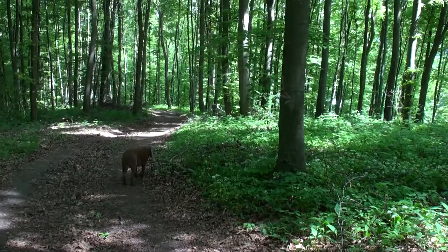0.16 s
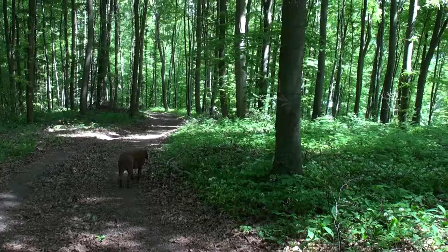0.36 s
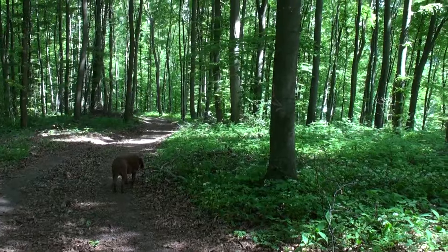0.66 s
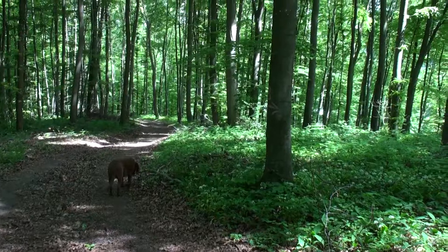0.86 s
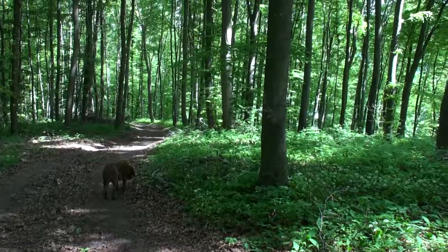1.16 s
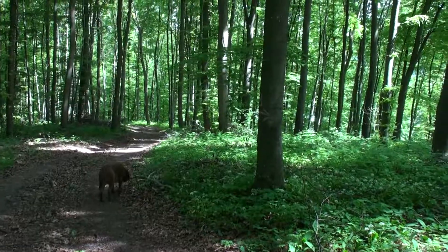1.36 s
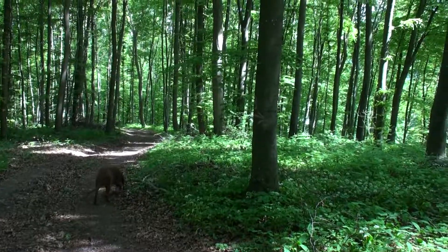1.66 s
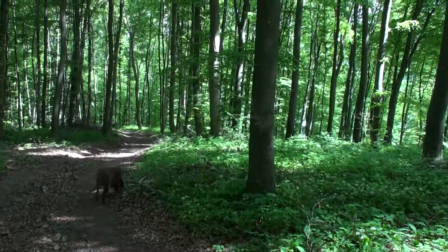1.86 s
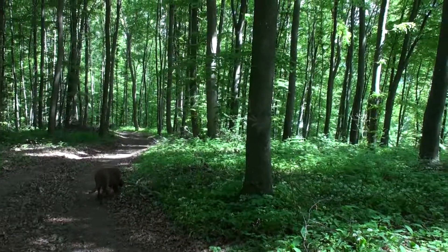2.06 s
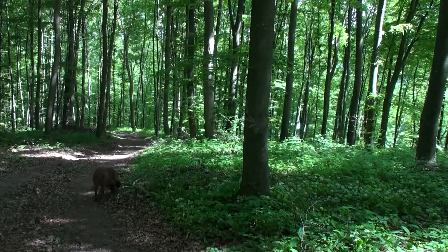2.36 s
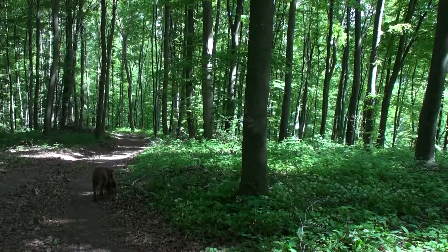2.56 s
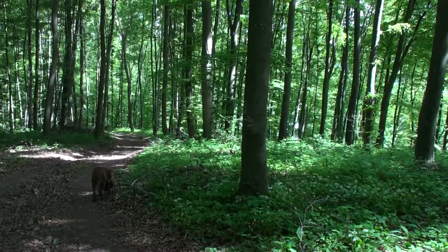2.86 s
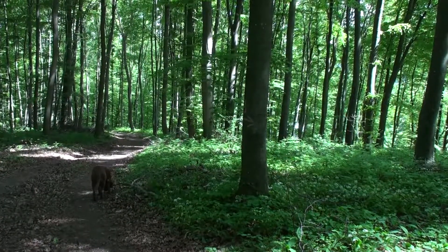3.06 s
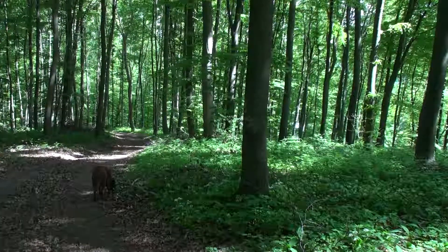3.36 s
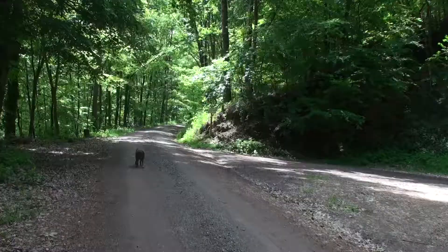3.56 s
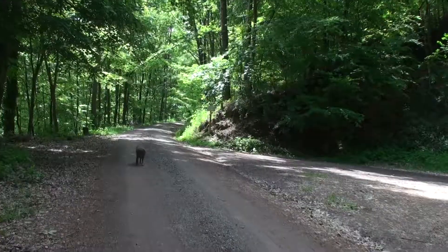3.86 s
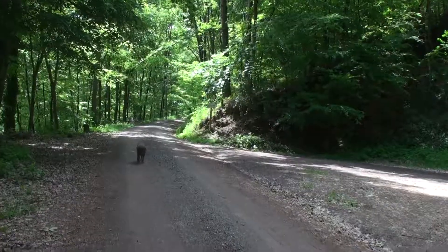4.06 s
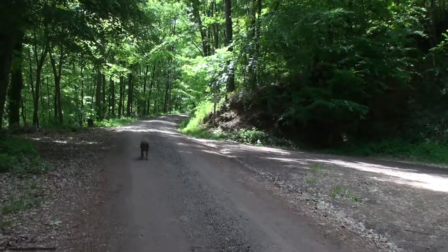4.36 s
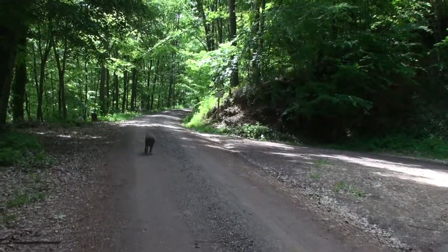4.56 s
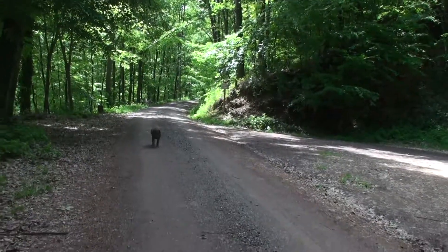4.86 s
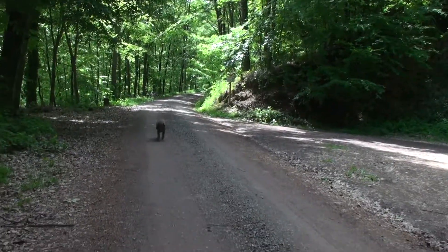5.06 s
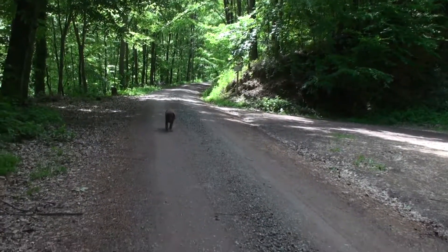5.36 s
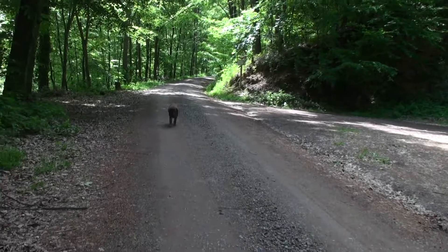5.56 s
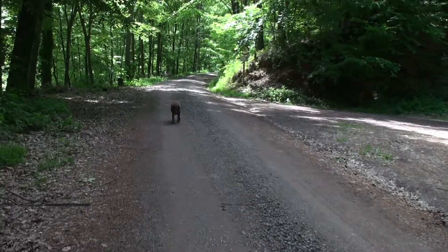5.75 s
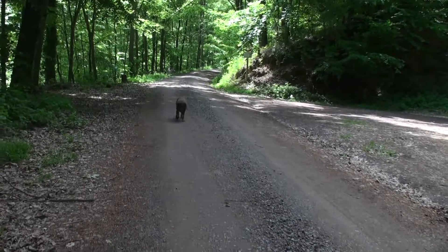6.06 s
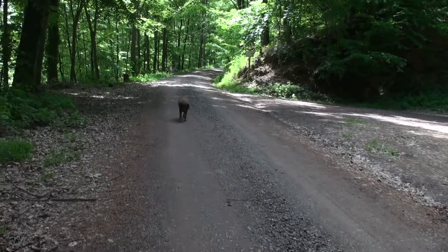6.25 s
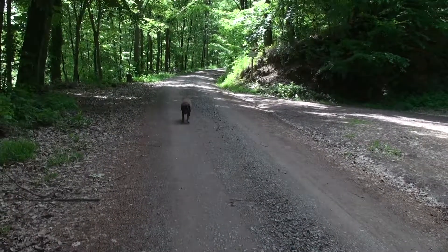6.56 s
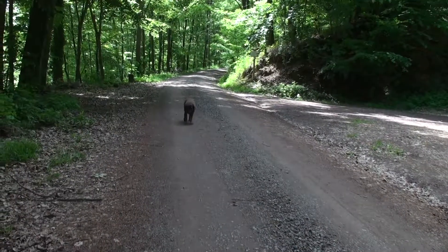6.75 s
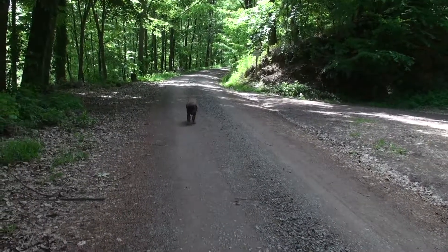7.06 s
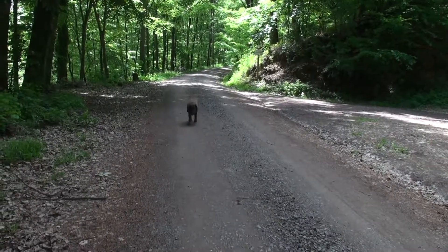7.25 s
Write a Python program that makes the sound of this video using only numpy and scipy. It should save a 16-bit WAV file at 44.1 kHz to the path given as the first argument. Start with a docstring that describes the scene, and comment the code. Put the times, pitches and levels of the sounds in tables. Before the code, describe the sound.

A quiet beech wood, with soft wide canopy air and a faint low hum. From 0 to 3.5 s thin high whistles and hoarse calls sound far away with long echoes; two plunging calls come at about 0.9 and 1.3 s. A dull scuff at 0.1 s is followed from 1.7 s by leaf rustles and small dry twig snaps close by, with soft low chirps from 3 s. A very sharp snap at 3.47 s meets an abrupt cut to a forest road with brighter air. A loud double chirp rings at 3.6 and 3.8 s, then distant calls and a few light clicks underfoot. From 5.6 s a near chaffinch, slightly left, swells through five notes, trills rapidly at 6.2 s, and from 6.45 s repeats loud falling sweeps to the end, about seven a second, topped by high buzzes, while a blackbird flutes mellow slurs.

```python
"""Thin, distant bird calls over a low hum, with scuffs and snapping twigs, open a walk in a beech wood.
A second spot follows abruptly, a forest road: a loud double chirp, then a blackbird's fluting and a near
chaffinch whose song swells into falling sweeps. Birds are gliding tones with overtones and pitch shake;
footfall and canopy air are filtered noise, twigs add damped swings. Trunks scatter notes into a tail."""
import sys
import numpy as np
from scipy import signal
from scipy.fft import rfft, irfft
from scipy.io import wavfile
from scipy.ndimage import uniform_filter1d

SR = 44100
rng = np.random.default_rng(int(sys.argv[2]) if len(sys.argv) > 2 else 0)


def file_out(sig):
    """Save sig as 16-bit WAV at sys.argv[1]."""
    # one column per channel
    cols = np.atleast_2d(sig).T
    # limit, then scale
    lim = np.clip(cols, -1, 1)
    pcm = np.round(lim * 32767).astype(np.int16)
    wavfile.write(sys.argv[1], SR, pcm)


N = 326781
TIME = np.arange(N) / SR
CUT_S, RESUME_S = 3.493, 3.501  # the path ends, the road begins
SWEEP_FIRST_S, SWEEP_PERIOD_S = 6.453, .1548  # beats of the chaffinch's falling sweeps
# shape of a call: (start and end pitch as factors of the middle pitch, rasp as share of the pitch)
WHISTLE_SHAPE, BUZZ_SHAPE = (1.018, 0.98, .011), (.91, 1.08, .075)


def undb(db):
    """Decibels to amplitude: 20 dB is a factor of ten."""
    return 10 ** (np.asarray(db) / 20)


def unit(x):
    """Power normalisation: scale to rms 1."""
    return x / np.sqrt(np.mean(x ** 2))


def add(track, s, sound):
    """Superposition: mix a sound into a track at time s."""
    i = int(s * SR)
    track[i:i + len(sound)] += sound[:max(N - i, 0)]


def walk(rate, size=N):
    """Low-passed random process: smooth chance of spread near 1 that changes rate times a second."""
    k = max(int(SR / rate), 2)
    steps = np.repeat(rng.standard_normal(size // k + 1), k)
    return 1.27 * uniform_filter1d(uniform_filter1d(steps, k), k)[:size]


def colour(x, points):
    """Spectral shaping: filter by (frequency [Hz], level [dB]) points joined on a log-frequency axis."""
    hz, db = np.transpose(points)
    log_hz = np.log(np.fft.rfftfreq(len(x), 1 / SR) + 1)
    return irfft(rfft(x) * undb(np.interp(log_hz, np.log(hz), db)), len(x))


def resonate(x, hz, width_hz):
    """Damped resonance: one peak whose quality factor is centre over bandwidth."""
    return signal.lfilter(*signal.iirpeak(min(hz, SR / 3), hz / min(width_hz, SR / 3), fs=SR), x)


def forest(x, scatter_db, tail_db, scatter_t60, tail_t60, pan_db):
    """Multiple scattering: direct sound, echoes off near trunks and a diffuse tail; total power is kept."""
    t = TIME[:2 * SR]
    noise = rng.standard_normal((6, len(t)))
    struck = rng.random((3, len(t))) < 1500 / SR  # about 1500 echoes a second
    trunks = noise[:3] * struck * undb(-60 * t / scatter_t60) * (t > .004)
    depths = noise[3:] * undb(-60 * t / tail_t60) * (1 - np.exp(-t / 0.038))
    echoes = undb(scatter_db) * unit(trunks) + undb(tail_db) * unit(depths)
    mid, left, right = echoes / np.sqrt(len(t))
    # most echoes come from the front and reach both ears alike
    response = mid + 0.4 * np.array([left, right])
    response[:, 0] += 1  # the direct sound
    response /= np.sqrt(np.sum(response ** 2) / 2)
    return signal.fftconvolve(x[None], response, axes=1)[:, :N] * undb([[pan_db / 2], [-pan_db / 2]])


def sing(notes, overtone_db, flutter_db):
    """Frequency modulation: tones glide through three pitches; a fast shake of the pitch makes them rasp."""
    out, shake, flutter = np.zeros(N), walk(1100, 2 * N), walk(90, 2 * N)
    for s, length, start, middle, end, db, rasp in notes:
        u = np.linspace(0, 1, int(length * SR))
        span = int(s * SR) + np.arange(len(u))
        glide = np.polyval(np.polyfit([0, .5, 1], [start, middle, end], 2), u)
        hz = glide * (1 + rasp * shake[span])
        phase = 2 * np.pi * np.cumsum(hz) / SR
        tone = 0
        for k in range(3):
            audible = (k + 1) * hz < SR / 2
            tone = tone + undb(overtone_db * np.sqrt(k)) * np.sin((k + 1) * phase) * audible
        # the note opens a little faster than it closes
        swell = np.sin(np.pi * u ** .8).clip(0) ** .65
        add(out, s, np.sqrt(2) * undb(db + flutter_db * flutter[span]) * swell * tone)
    return out


def calls(rows, shape):
    """Scaling of pitch contours: every call of one kind has the same bend and rasp."""
    start, end, rasp = shape
    return [(s, length, start * hz, hz, end * hz, db, rasp) for s, length, hz, db in rows]


def phrase(syllable, beats):
    """Repetition: place a syllable on each beat at that beat's level and pitch factor."""
    return [(s + lag, length, a * pitch, b * pitch, c * pitch, db + part_db, rasp)
            for s, db, pitch in beats for lag, length, a, b, c, part_db, rasp in syllable]


def beats(count, first_s, period_s, db, gain_db, pitch, sag):
    """Linear progression: even beats whose level steps by gain_db and pitch factor falls by sag."""
    return [(first_s + k * period_s, db + k * gain_db, pitch - k * sag) for k in range(count)]


def air(spectrum, db, sway_db, low_mid_db):
    """Broadband noise of the canopy: alike in both ears in the bass and wide in the treble."""
    # width of the air: (frequency [Hz], side minus mid [dB])
    side_spectrum = [(30, -27), (70, -25), (130, -13), (270, -6), (500, -4), (1000, -3), (3000, -1.5),
                     (12000, -2.5)]
    mid, side = (colour(rng.standard_normal(N), spectrum) for _ in range(2))
    pair = mid + np.array([[1], [-1]]) * colour(side, side_spectrum)
    pair = np.array([colour(ear, [(70, 0), (115, low_mid_db), (180, 0)]) for ear in pair])
    return unit(pair) * undb(db + sway_db * walk(3.14))


def drone(hz, db, waver_hz, sway_db):
    """Slow random modulation: a faint lasting tone wavers in pitch and strength."""
    phase = 2 * np.pi * np.cumsum(hz + waver_hz * walk(12)) / SR
    return unit(np.sin(phase) * undb(sway_db * walk(11))) * undb(db)


def distant_calls():
    """Pitch contours of small birds at both spots: whistles sag, hoarse calls and lisps rise."""
    # thin distant whistles: (time [s], length [s], pitch [Hz], level [dB])
    whistles = [(.035, 0.057, 6080, -46), (.42, 0.12, 5460, -39.5), (.69, 0.16, 4090, -42.5),
                (1.33, .24, 2740, -51.5), (1.89, 0.24, 7460, -46), (2.2, 0.098, 7380, -46),
                (2.4, .14, 4790, -41.5), (2.52, .18, 3770, -46.5), (2.68, .15, 5740, -52),
                (2.745, 0.13, 4100, -41.5), (2.88, .16, 5000, -46), (3.22, 0.094, 7700, -51.5),
                (3.29, 0.16, 6800, -54.5), (3.6, .1, 2104, -44.5), (5.08, 0.077, 4155, -38),
                (5.35, 0.085, 5250, -41.5)]
    # hoarse distant calls: (time [s], length [s], pitch [Hz], level [dB])
    buzzes = [(.085, 0.058, 2520, -37), (.13, .15, 4160, -42.5), (1.42, .18, 4145, -42.5),
              (2.62, 0.21, 4185, -41.5), (3.5, .16, 2577, -38.5), (3.61, 0.071, 3830, -34.5),
              (3.78, .16, 4950, -47), (3.95, .13, 2645, -40.5), (4.87, .16, 4810, -46.5),
              (5.47, .1, 4500, -40)]
    # very high lisping calls: (time [s], length [s], pitch [Hz], level [dB])
    lisps = [(.08, .04, 6560, -43), (4.17, .14, 7550, -50.5), (4.34, .07, 8170, -45),
             (4.61, .12, 7250, -49.5), (5.22, .08, 7450, -49)]
    lisp_shape = (0.98, 1.02, .033)
    return calls(whistles, WHISTLE_SHAPE) + calls(buzzes, BUZZ_SHAPE) + calls(lisps, lisp_shape)


def path_birds():
    """Direct-to-scattered ratio: crown whistles carry long echoes, undergrowth chirps short weak ones."""
    # a call that plunges between two thin notes:
    # (time from the beat [s], length [s], start [Hz], middle [Hz], end [Hz], level [dB], rasp [share of pitch])
    plunge = [(-.03, 0.051, 7250, 7150, 7000, -6, .016), (0, .11, 6800, 3890, 2550, 0, .055),
              (.025, .07, 5300, 5190, 5080, -4.5, .026)]
    # it comes twice: (time [s], level [dB], pitch [factor])
    plunge_beats = [(.943, -44, 0.99), (1.262, -46.5, 1)]
    # a slur in the crowns and one in the undergrowth:
    # (time [s], length [s], start [Hz], middle [Hz], end [Hz], level [dB], rasp [share of pitch])
    falling_slur = (2.305, .085, 5560, 5180, 4950, -40.5, .015)
    rising_slur = (1.742, .14, 2750, 3410, 4270, -45.5, .006)
    # soft chirps: (time [s], pitch [Hz], level [dB])
    chirp_rows = [(2.975, 2600, -41), (3.129, 2482, -41), (3.248, 2730, -36.5), (3.338, 3020, -35),
                  (3.424, 2980, -37)]
    chirp_s, chirp_shape = 0.0215, (.86, 0.83, 0.068)
    notes = [note for note in distant_calls() if note[0] < CUT_S]
    notes += phrase(plunge, plunge_beats) + [falling_slur]
    chirps = calls([(s, chirp_s, hz, db) for s, hz, db in chirp_rows], chirp_shape)
    high = sing(notes, overtone_db=-45, flutter_db=3.0)
    low = sing(chirps + [rising_slur], overtone_db=-28, flutter_db=1.5)
    crowns = forest(high, scatter_db=0, tail_db=-1.0, scatter_t60=0.47, tail_t60=1.95, pan_db=-2.5)
    undergrowth = forest(low, scatter_db=-7, tail_db=-10, scatter_t60=.12, tail_t60=.7, pan_db=2)
    return crowns + undergrowth


def scuffs():
    """Granular friction: dense grains of soil and dry leaf swell and fade under a sliding step."""
    # scuffs in the leaf litter: (time [s], length [s], level [dB], centre [Hz], width [Hz])
    scuff_rows = [(0.081, 0.17, -37, 820, 600), (1.681, 0.18, -46.5, 5500, 8000),
                  (2.569, 0.067, -38.5, 4500, 9000), (3.197, 0.2, -46, 380, 600),
                  (4.5, 0.45, -51.5, 212, 160)]
    out = np.zeros(N)
    for s, length, db, hz, width_hz in scuff_rows:
        strength = undb(2.73 * rng.exponential(size=SR))
        grains = rng.standard_normal(SR) * strength * (rng.random(SR) < .08)
        swell = np.sin(np.linspace(0, np.pi, int(length * SR)))
        add(out, s, undb(db) * swell * unit(resonate(grains, hz, width_hz))[:len(swell)])
    return forest(out, scatter_db=-1.5, tail_db=-14, scatter_t60=0.14, tail_t60=.9, pan_db=1.5)


def snaps():
    """Damped impact: one sharp cycle of bending wood, a short splintery rattle and a bright crack."""
    # twigs and grit underfoot: (time [s], level [dB], ring [Hz], crack level before its scaling [dB])
    snap_rows = [(1.818, -22.5, 2180, -17), (1.937, -21, 1710, -21), (2.254, -16, 2100, -18),
                 (2.584, -16, 1750, -15), (2.618, -27, 1700, -9), (2.717, -20.5, 1850, -20),
                 (2.858, -26, 750, -21), (2.866, -22.5, 740, -26), (2.887, -24.5, 2380, -22),
                 (3.005, -27.5, 1510, -11), (3.239, -19, 2030, -17), (3.327, -22.5, 1900, -18),
                 (3.397, -18, 830, -16), (3.4729, -6, 2110, 3.5), (3.966, -16, 2050, -30),
                 (4.048, -23, 2000, -22), (5.176, -26, 6460, -19)]
    rattle_cycles = 30  # swings until the rattle has died away by 60 dB
    out, t = np.zeros(N), TIME[:SR // 20]
    noises = rng.standard_normal((len(snap_rows), 2, len(t)))
    for (s, db, hz, crack_db), noise in zip(snap_rows, noises):
        swing = np.sin(2 * np.pi * hz * t)
        # a thin stick radiates little bass
        bend = 1.28 * resonate(swing * np.exp(-2 * hz * t), hz, 2.1 * hz)
        splinters = 0.37 * unit(resonate(noise[0], hz, 0.88 * hz))
        rattle = (0.18 * swing + splinters) * undb(-60 * t * hz / rattle_cycles)
        crack = 0.34 * unit(resonate(noise[1], 10600, 3000)) * undb(crack_db - 60 * t / 0.0065)
        add(out, s, undb(db) * (bend + rattle + crack))
    return forest(out, scatter_db=-14, tail_db=-28, scatter_t60=.05, tail_t60=.6, pan_db=-.2)


def chorus(count):
    """Random superposition: faint hoarse calls by the road, one at a chance moment in each equal gap."""
    centre_hz, spread_octaves, db, note_s = 4196, .22, -48.5, .2
    gap_s = (N / SR - RESUME_S) / count
    rows = []
    for k, (when, pitch) in enumerate(rng.random((count, 2))):
        hz = centre_hz * 2 ** (spread_octaves * (2 * pitch - 1))
        rows.append((RESUME_S + (k + when) * gap_s, note_s, hz, db))
    return calls(rows, BUZZ_SHAPE)


def road_birds():
    """Reverberant layering: distant birds, a sharp double chirp, a blackbird and high buzzes."""
    # the double chirp beside the road:
    # (time [s], length [s], start [Hz], middle [Hz], end [Hz], level [dB], rasp [share of pitch])
    road_call = [(3.555, 0.019, 3236, 3430, 3400, -24, .008), (3.58, 0.013, 3455, 3330, 3000, -18, 0.0073),
                 (3.757, 0.058, 3080, 3600, 3700, -19, 0.035), (3.79, 0.0487, 3610, 3760, 3670, -26, 0.02),
                 (3.845, 0.073, 3850, 3680, 3400, -25, 0.018)]
    # sharp high pips over the song: (time [s], length [s], pitch [Hz], level [dB])
    pips = [(6.77, .042, 9250, -39), (7.326, 0.038, 6340, -21)]
    flute = sing(fluting(), overtone_db=-36, flutter_db=1.1)
    call = sing(road_call, overtone_db=-44, flutter_db=1.2)
    buzz = sing(upper_notes() + calls(pips, WHISTLE_SHAPE), overtone_db=-16.5, flutter_db=4.5)
    far_notes = [note for note in distant_calls() if note[0] > CUT_S] + chorus(count=28)
    far = sing(far_notes, overtone_db=-33, flutter_db=4)
    return (forest(flute, scatter_db=-1.0, tail_db=-10.5, scatter_t60=0.38, tail_t60=1.5, pan_db=-1.0)
            + forest(call, scatter_db=-3.5, tail_db=-1.0, scatter_t60=0.33, tail_t60=1.37, pan_db=-1.0)
            + forest(buzz, scatter_db=2, tail_db=0.5, scatter_t60=0.29, tail_t60=2.5, pan_db=3)
            + forest(far, scatter_db=-1.5, tail_db=0.5, scatter_t60=0.41, tail_t60=1.36, pan_db=-0.5))


def chaffinch():
    """Source and filter: swelling opening notes, a fast trill, then falling sweeps coloured by the throat."""
    # syllables of the three phrases:
    # (time from the beat [s], length [s], start [Hz], middle [Hz], end [Hz], level [dB], rasp [share of pitch])
    opening_syllable = [(-.038, 0.0399, 5375, 5237, 4950, 0, .022),
                        (-.008, .014, 2970, 3680, 6200, -4, 0.069), (0, .016, 6200, 4200, 2900, 3.2, .07)]
    trill_syllable = [(-.014, .016, 4600, 5000, 4900, -4, .015), (0, .018, 4850, 3750, 2550, 3.2, .008)]
    sweep_syllable = [(-.04, .03, 4650, 4600, 4400, -13, .035), (-.014, .022, 5100, 5000, 4500, -14, .1),
                      (-.006, .008, 3100, 3600, 3850, -8, .02), (0, .056, 3950, 2750, 1850, 0, .005)]
    # the throat favours the top of each sweep: (frequency [Hz], level [dB])
    throat = [(1800, -8.5), (2500, -7.5), (3100, -1.5), (3800, 6), (4800, 3.5)]
    opening_beats = beats(5, first_s=5.625, period_s=.1185, db=-30.3, gain_db=2.3, pitch=1.01, sag=.012)
    trill_beats = beats(5, first_s=6.161, period_s=.0448, db=-20.5, gain_db=1.5, pitch=1, sag=.002)
    sweep_beats = beats(7, SWEEP_FIRST_S, SWEEP_PERIOD_S, db=-12.8, gain_db=-.1, pitch=1.02, sag=.005)
    opening = sing(phrase(opening_syllable, opening_beats), overtone_db=-31, flutter_db=1.8)
    trill = sing(phrase(trill_syllable, trill_beats), overtone_db=-36, flutter_db=.5)
    sweeps = colour(sing(phrase(sweep_syllable, sweep_beats), overtone_db=-33, flutter_db=.5), throat)
    return (forest(opening, scatter_db=3.5, tail_db=4, scatter_t60=0.59, tail_t60=2.3, pan_db=3.0)
            + forest(trill, scatter_db=-.5, tail_db=-.5, scatter_t60=.6, tail_t60=1.2, pan_db=2.8)
            + forest(sweeps, scatter_db=0.5, tail_db=-4, scatter_t60=0.53, tail_t60=2.7, pan_db=2.6))


def fluting():
    """Portamento: each blackbird note slurs to its end pitch; some linger there, softer."""
    # blackbird notes:
    # (time [s], slur [s], hold [s], start [Hz], end [Hz], level [dB], rasp [share of pitch])
    blackbird = [(5.685, 0.063, 0, 1780, 1640, -38, 0.011), (5.728, 0.041, 0, 1400, 1650, -33.5, 0.052),
                 (5.76, 0.069, 0.0021, 1810, 1947, -28.5, .008), (5.945, .072, 0, 1580, 1440, -30, .005),
                 (6, .08, 0, 1430, 1340, -36.5, .009), (6.162, 0.124, 0, 2258, 2321, -20, .005),
                 (6.385, .111, 0.25, 2110, 1902, -22.5, 0.015),
                 (6.784, 0.067, 0.0075, 2350, 2805, -16, 0.14), (6.934, 0.091, .14, 2130, 1966, -22, 0.037)]
    slur_share = .85  # share of the glide done by mid-slur
    hold_db, hold_rasp = -3, 0.026  # held end: level relative to the slur, rasp as share of pitch
    notes = []
    for s, slur_s, hold_s, start, end, db, rasp in blackbird:
        notes.append((s, slur_s, start, start + slur_share * (end - start), end, db, rasp))
        if hold_s > 0:
            notes.append((s + .8 * slur_s, hold_s, end, end, end, db + hold_db, hold_rasp))
    return notes


def upper_notes():
    """Synchrony: a high, pitch-shaken buzz starts just ahead of each of the chaffinch's sweeps."""
    # one row per sweep: (pitch [Hz], level [dB])
    upper_rows = [(6600, -30), (6580, -29.5), (6600, -33), (5270, -33), (5500, -31), (6530, -24.5),
                  (6500, -24)]
    lead_s, length_s, upper_shape = .025, .085, (1.03, 0.95, 0.0863)
    rows = [(SWEEP_FIRST_S + k * SWEEP_PERIOD_S - lead_s, length_s, hz, db)
            for k, (hz, db) in enumerate(upper_rows)]
    return calls(rows, upper_shape)


def scene():
    """Superposition in time: the path gives way abruptly to the road; footfall runs through both."""
    # relative spectra of the canopy air at each spot: (frequency [Hz], level [dB per Hz])
    path_spectrum = [(15, -38), (25, -6), (104, -0.5), (129, -5), (164, -8.5), (433, -9), (537, -9.5),
                     (741, -5.5), (1200, -9.5), (1530, -12.5), (2630, -15.5), (2850, -19), (4150, -19),
                     (5880, -23), (15500, -31.5)]
    road_spectrum = [(15, -34), (25, -3), (59, 2), (122, -9), (198, -1), (253, -5.5), (349, -2.5),
                     (1020, -4), (1200, -4.5), (1620, -7), (2920, -9), (4260, -8), (5880, -13),
                     (7300, -16.5), (15500, -24)]
    path = air(path_spectrum, db=-40.5, sway_db=.5, low_mid_db=-6)
    path = path + drone(hz=112.5, db=-52, waver_hz=2.0, sway_db=2.5) + path_birds()
    road = air(road_spectrum, db=-41, sway_db=1.06, low_mid_db=1.3)
    road = road + drone(hz=1190, db=-59.5, waver_hz=2.98, sway_db=2.5) + road_birds() + chaffinch()
    # short ramps soften both edges
    on_path = uniform_filter1d(1. * (TIME < CUT_S), size=128)
    on_road = uniform_filter1d(1. * (TIME > RESUME_S), size=128)
    return path * on_path + road * on_road + snaps() + scuffs()


def record(dry):
    """Band limiting: filters remove the deepest rumble and the top of the treble."""
    bass_cut = signal.butter(4, 31, "highpass", fs=SR, output="sos")
    top_cut = signal.ellip(10, .2, 80, 15800, fs=SR, output="sos")
    return signal.sosfilt(np.vstack([bass_cut, top_cut]), dry, axis=-1)


dry = scene()
out = record(dry)
file_out(out)
```